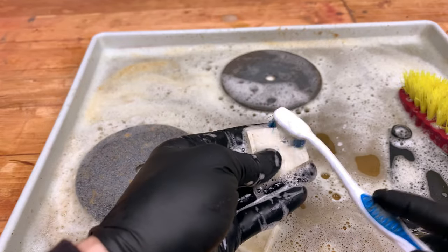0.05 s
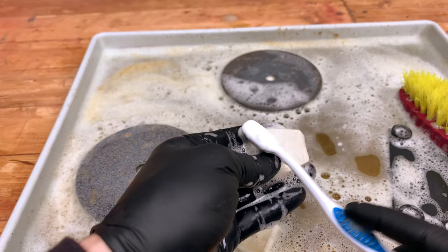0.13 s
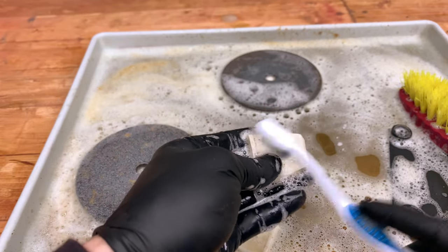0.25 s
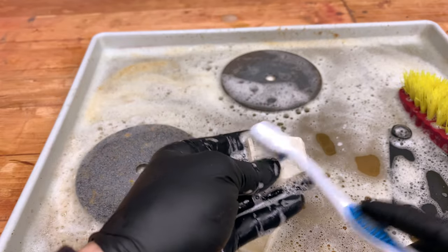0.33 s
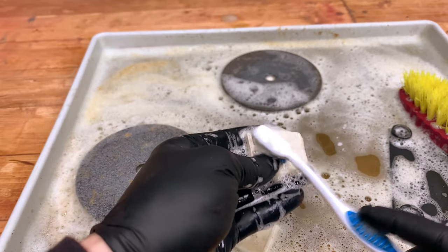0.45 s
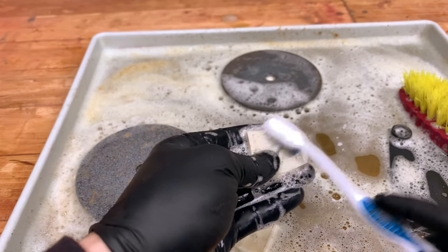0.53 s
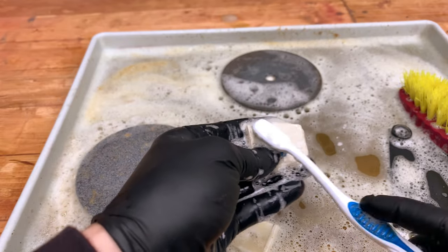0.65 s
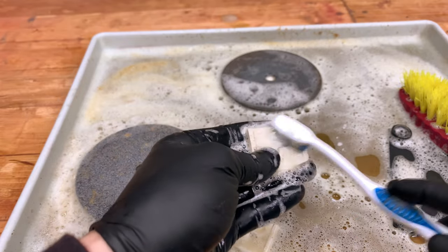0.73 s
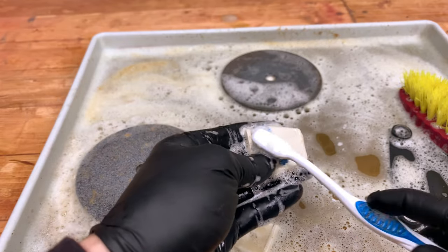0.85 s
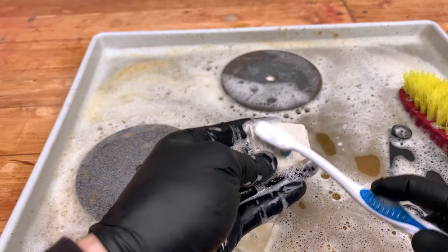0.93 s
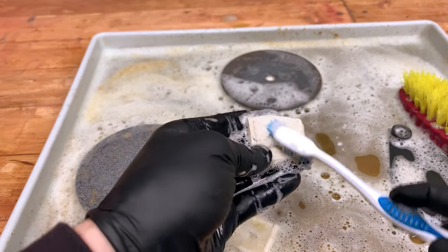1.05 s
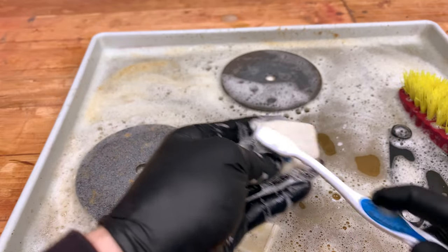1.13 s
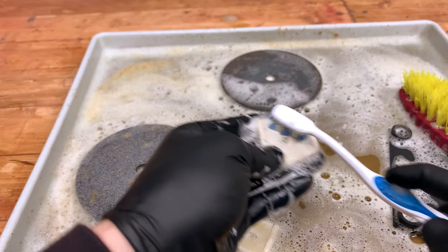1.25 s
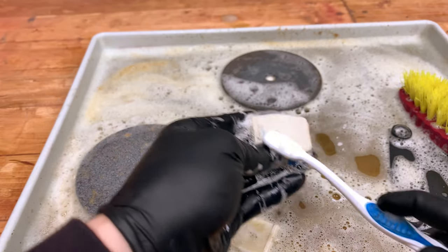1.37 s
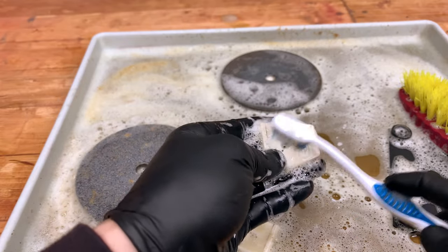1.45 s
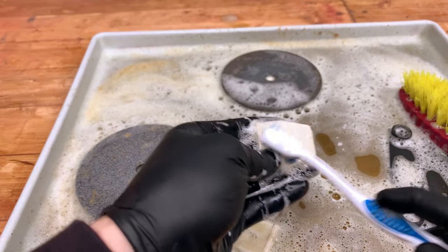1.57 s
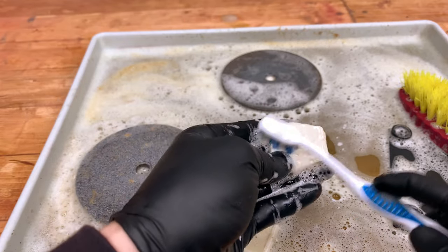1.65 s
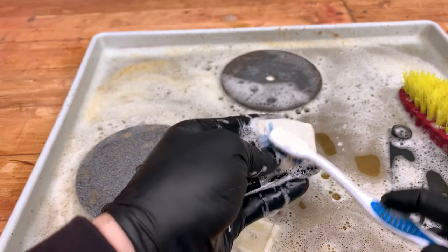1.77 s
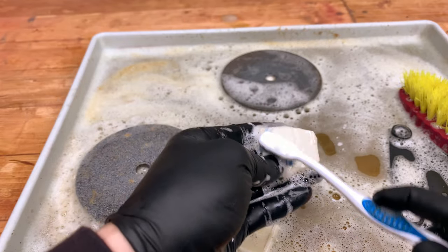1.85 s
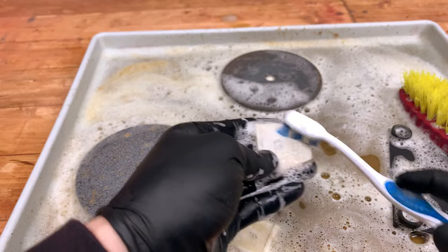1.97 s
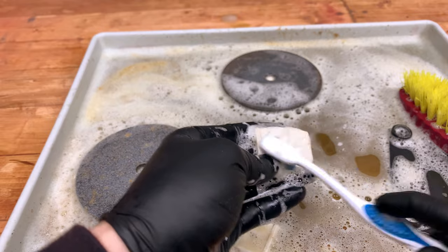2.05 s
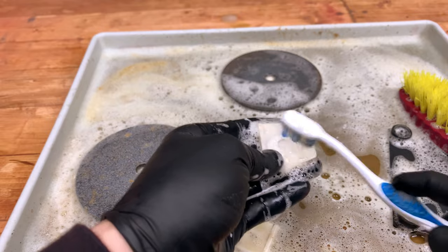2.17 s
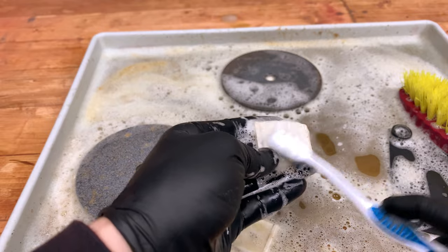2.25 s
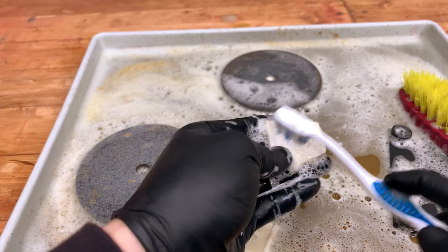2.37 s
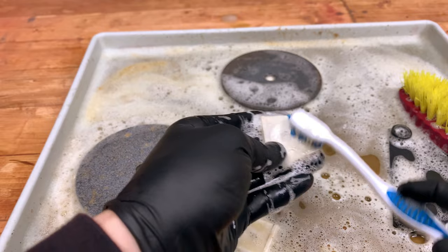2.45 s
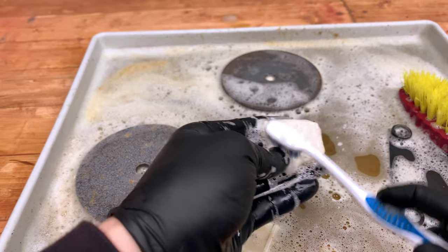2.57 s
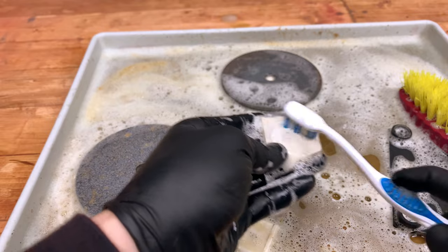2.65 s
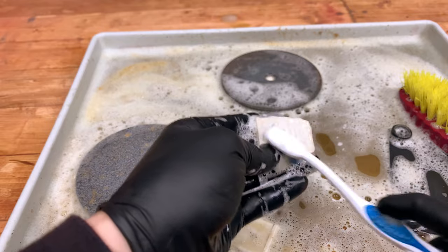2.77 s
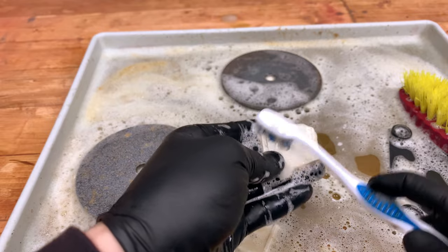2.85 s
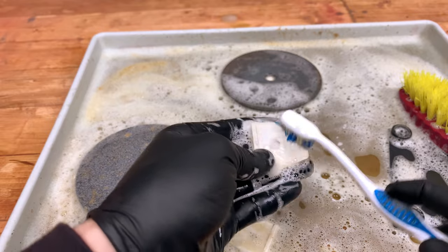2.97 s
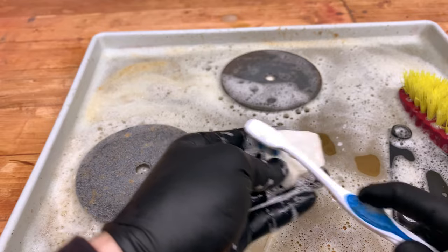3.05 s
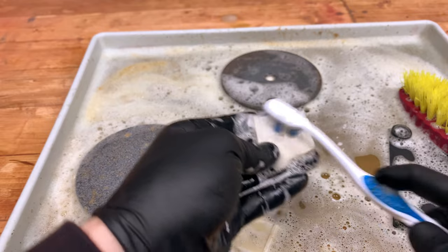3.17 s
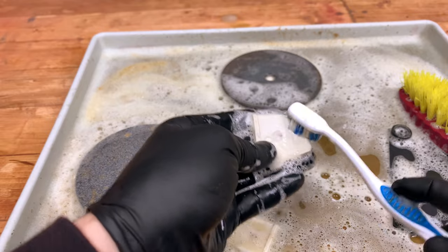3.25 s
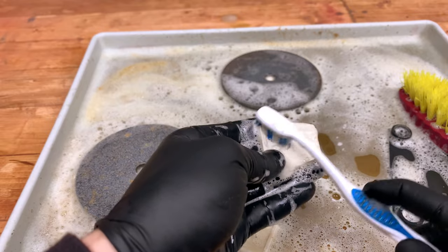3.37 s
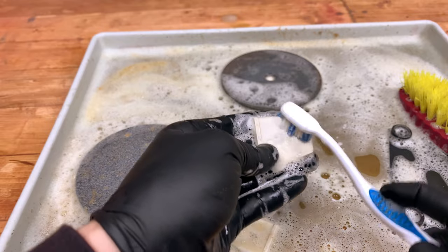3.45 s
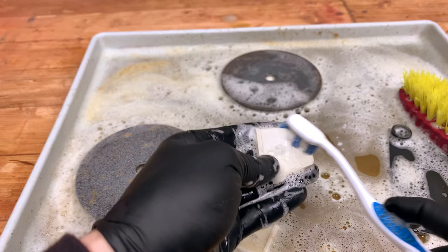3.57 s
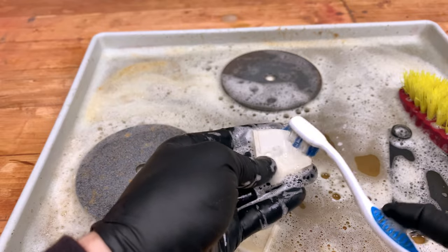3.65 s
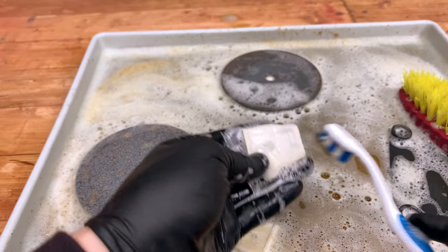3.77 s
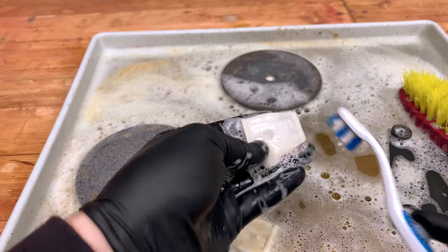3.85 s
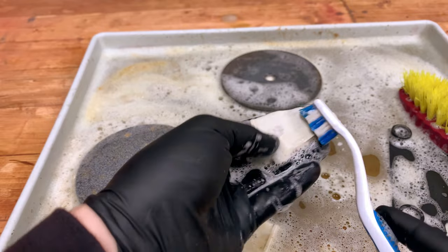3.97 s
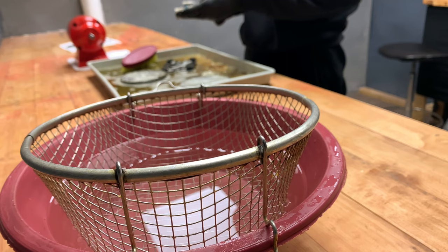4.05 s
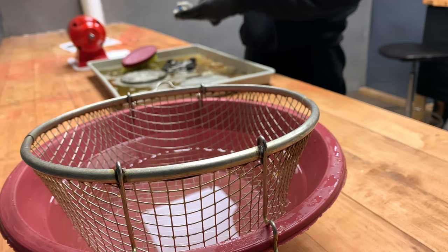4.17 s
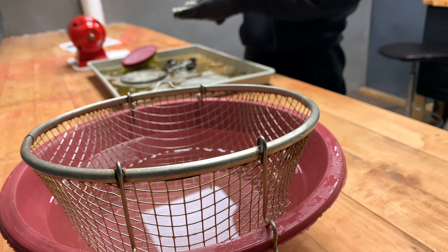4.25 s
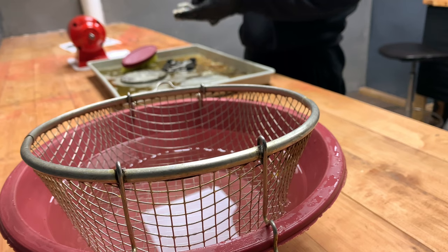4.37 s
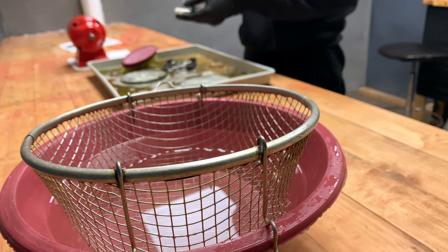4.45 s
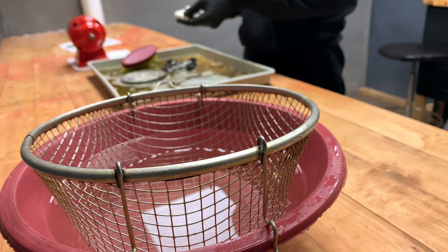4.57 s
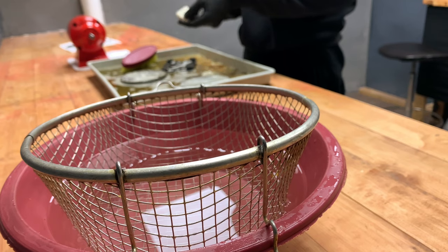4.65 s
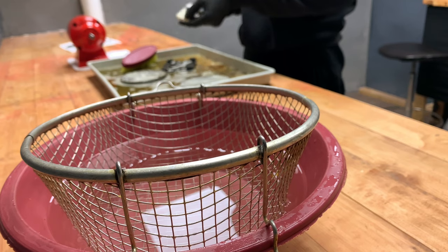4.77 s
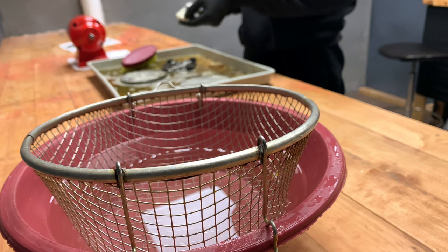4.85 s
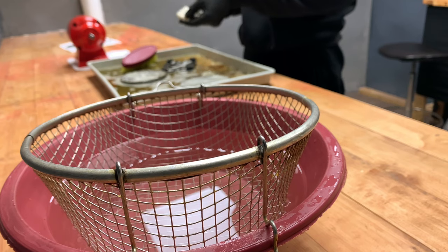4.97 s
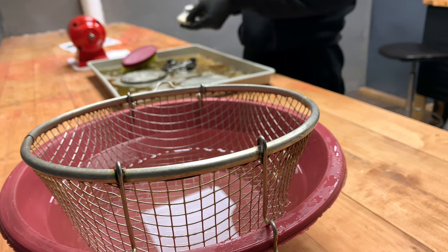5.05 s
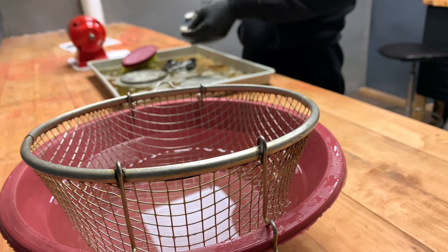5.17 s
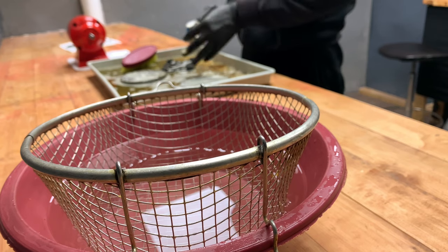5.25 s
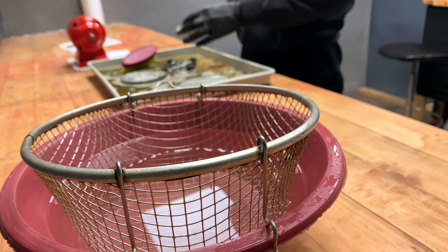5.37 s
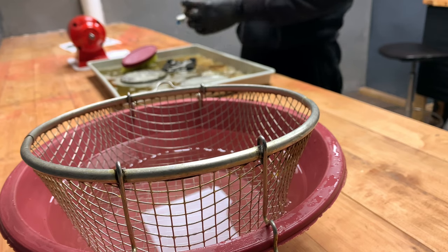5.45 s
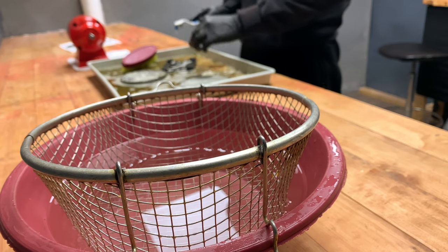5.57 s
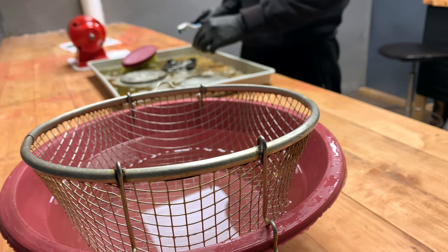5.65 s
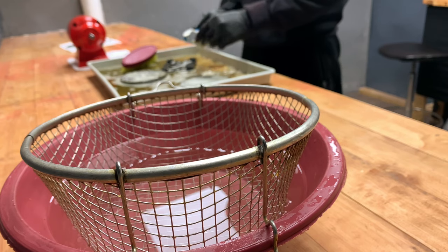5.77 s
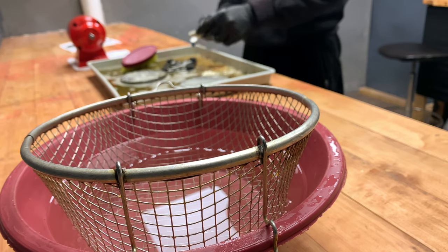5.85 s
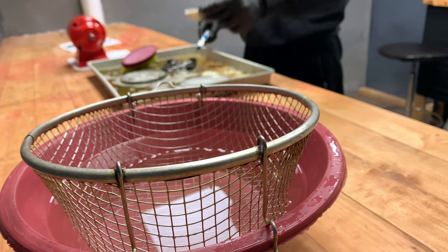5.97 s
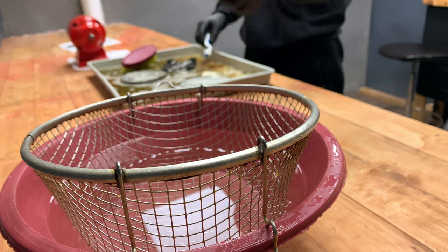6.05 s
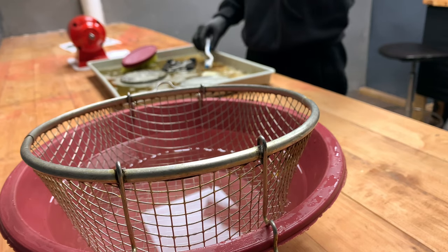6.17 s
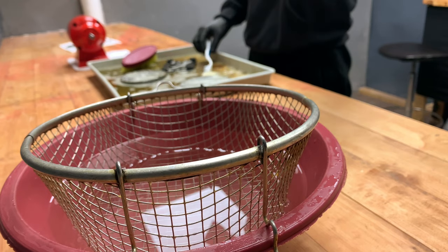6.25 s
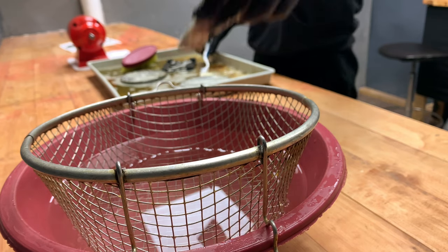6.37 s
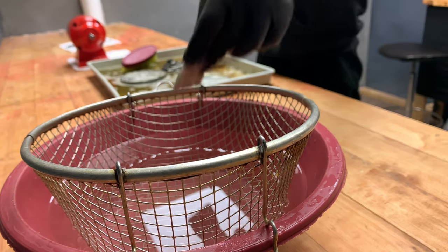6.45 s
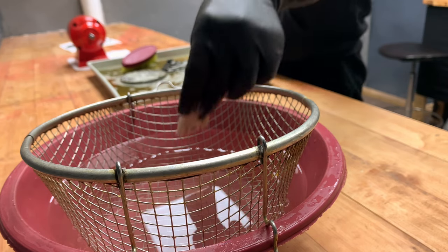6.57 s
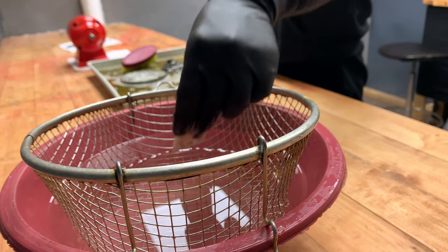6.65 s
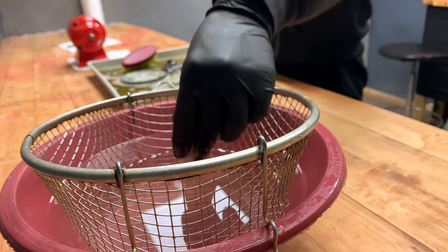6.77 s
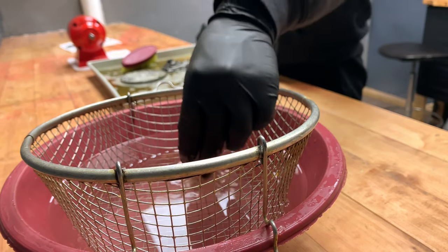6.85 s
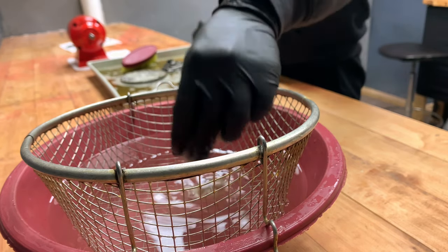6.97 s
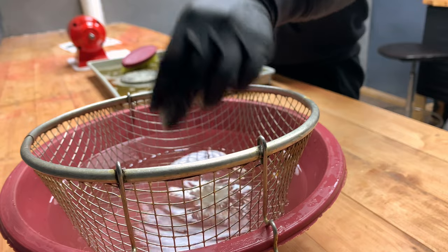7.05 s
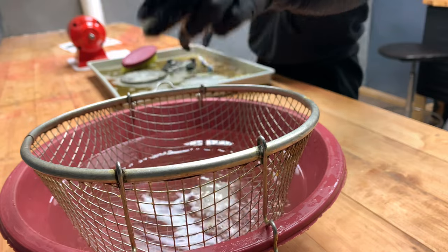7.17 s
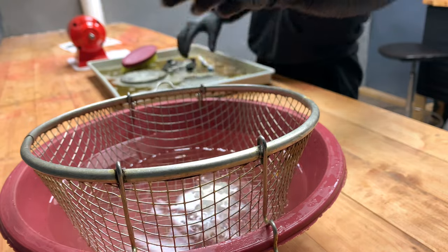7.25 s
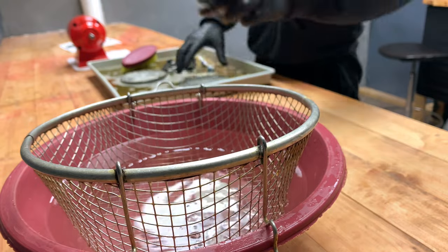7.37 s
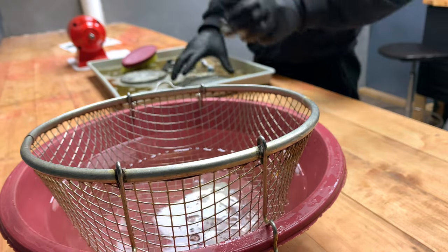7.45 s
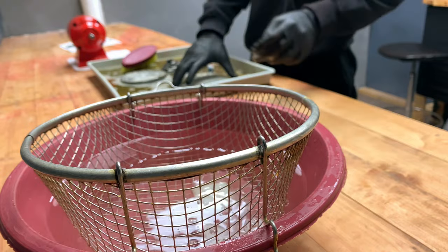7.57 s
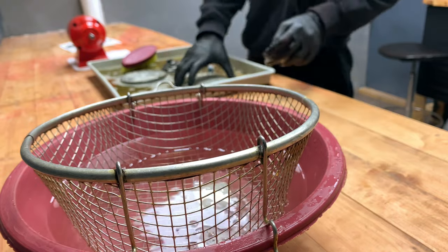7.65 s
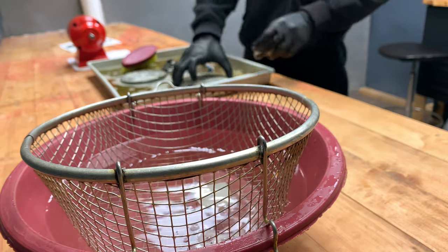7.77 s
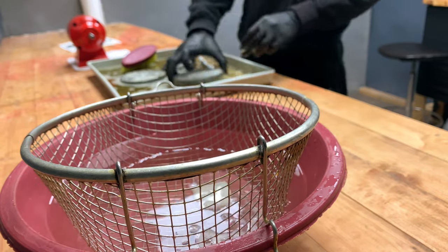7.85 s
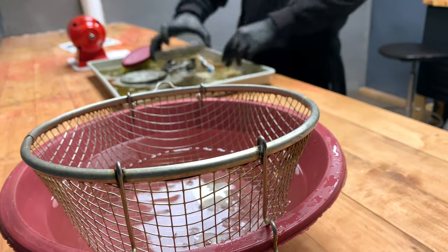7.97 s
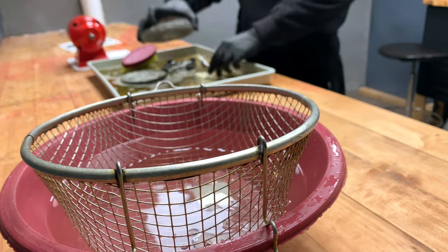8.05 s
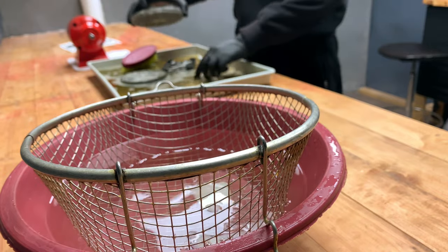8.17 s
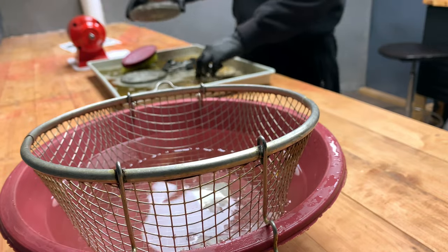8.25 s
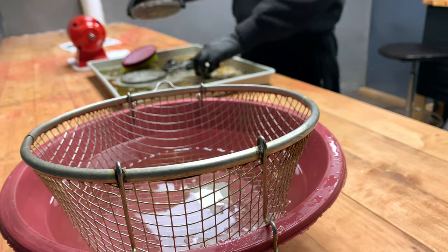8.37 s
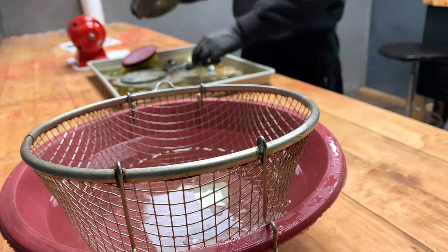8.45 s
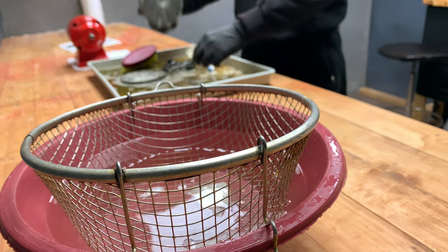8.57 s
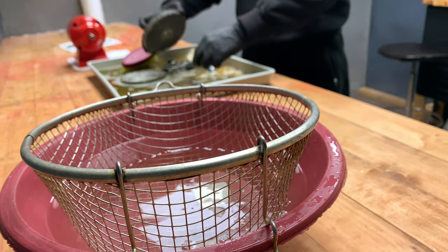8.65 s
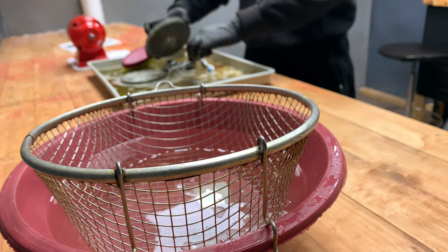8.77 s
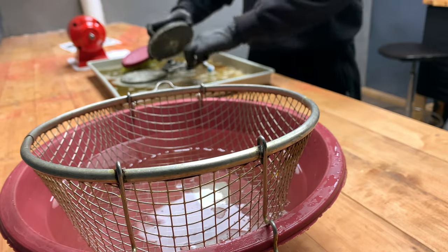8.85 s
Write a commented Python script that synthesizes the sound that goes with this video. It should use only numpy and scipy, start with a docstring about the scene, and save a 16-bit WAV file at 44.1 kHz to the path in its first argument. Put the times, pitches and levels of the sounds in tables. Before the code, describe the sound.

Rapid, wet toothbrush strokes fizz and scrape on a soapy metal part, heard up close over a low workshop hum. The microphone position shifts across the bench, where the brushing is much quieter and then stops. After faint wet ticks, parts are put down: metal clanks, a wire basket rattles, and a plastic tray and wooden bench thud, each knock ringing briefly in the room.

```python
"""A workshop bench, heard through a microphone whose two ports catch the sound at different phases.
Close up, a toothbrush scrubs a small metal part over a tray of suds: bristles slip, wet tufts snap,
bubbles ring. From 4 s we listen from across the bench, and the scrubbing soon ends. Parts are put
down and knock on basket, tray and bench: wire rattles, metal clanks, plastic and wood boom.
The room rings briefly; machinery hums low underneath."""
import sys
import numpy as np
from scipy import signal
from scipy.fft import rfft, irfft, next_fast_len
from scipy.io import wavfile

SR = 44100
rng = np.random.default_rng(int(sys.argv[2]) if len(sys.argv) > 2 else 0)


def master(y):
    """Save y as 16-bit WAV."""
    cut = np.clip(np.atleast_2d(y).T, -1, 1)
    pcm = np.round(cut * 32767)  # scale
    wavfile.write(sys.argv[1], SR, pcm.astype(np.int16))


N = 393372

# room tone: f/Hz, density/dB
ROOM_TONE = [(15, -67.5), (25, -37.5), (69, 0), (91, -9.5), (148, -11), (204, -20.5), (253, -17),
             (614, -44), (3340, -50.5), (15500, -54.5)]
# machinery and room hum: f/Hz, width/Hz, early level/dB, shift at t/s, late level/dB, far level/dB
HUM_TONES = [(53.7, 3.5, -49.5, 2.94, -63, -67.5), (63, 0.88, -61.5, 3.3, -48.5, -63),
             (83.3, 12, -67.5, 2, -67.5, -59.5), (146.5, 3.88, -66.5, 2.65, -72.5, -61),
             (193.7, 3, -60.5, 1.93, -69, -67), (236, 3, -69.5, 2.88, -88, -88)]
# a faint wavering tone in the room: t/s, f/Hz, level/dB
WAVER_PATH = [(4.03, 351, -77), (4.07, 347.4, -62.5), (4.3, 368, -60), (4.7, 387, -64.5), (4.8, 415, -49),
              (4.9, 417, -72.5), (5.03, 384.5, -69.5), (5.15, 413, -78)]
# wet ticks of drips and gloves: t/s, level/dB, f/Hz, decay time/ms
WET_TICKS = [(5.22, -69, 5170, 12), (5.222, -67, 10000, 6.7), (5.512, -71, 4940, 16),
             (5.712, -67, 4900, 6.5), (5.988, -66, 4150, 5.8), (7.352, -74, 10500, 60),
             (7.368, -65, 5130, 27), (7.414, -77, 5050, 68), (7.478, -73, 10300, 12),
             (7.524, -74, 10500, 14), (8.488, -72, 6200, 60)]
# knocks and slides: t/s, clatter/dB, thump/dB, tilt/(dB/oct), extra tilt over 6 kHz/(dB/oct), attack/ms
PART_KNOCKS = [(5.77, -72, -75, 1, -9, 8.2), (5.906, -71.5, -58, -21, -13, 9.1),
               (5.959, -60.5, -54, -15.5, -15, 11), (6.039, -69.5, -51, 0, -8, 9.4),
               (6.189, -57.5, -51, -17.5, -11, 140), (6.278, -49, -56, -3.5, -16, 3.2),
               (6.31, -51.5, -59, 0.5, -15, 32), (6.346, -46.5, -44, -2, -22, 4.7),
               (6.43, -55, -56, -3.5, -8, 1.9), (6.576, -64.5, -68, -4.5, 5, 55),
               (6.765, -40, -63.5, -5, -1, 46), (6.788, -30.5, -36.5, -1.5, -3.5, 1.9),
               (6.845, -33, -33, -3.5, 16.5, 0.37), (6.921, -47, -44, -4, -11.5, 3),
               (7.02, -45, -57, -3.5, -13, 54), (7.09, -30, -29.5, -4, -62.5, 0.83),
               (7.194, -46, -50.5, -6, -23, 0.86), (7.571, -61, -60.5, -16, -15, 150),
               (7.646, -67.5, -63, -5, -12, 32), (7.738, -59, -54, 3.5, 0.5, 7.7),
               (7.797, -43, -40.5, -3, 3, 47), (7.857, -31, -18, -9.5, 10, 0.25),
               (7.983, -64, -41.5, 2, -20, 3.1), (8.172, -58, -57, -8.5, -10, 3),
               (8.226, -60.5, -53, -4.5, -8.5, 3.1), (8.322, -62.5, -56, -6, -8.5, 3.8)]
# modes of the wooden bench: f/Hz, level/dB, T60/s
BENCH_MODES = [(65, 8, 0.58), (85.3, 1, 0.35), (138.4, -14, 0.88), (165.3, -5, 0.16), (197.7, -19, 0.44),
               (262.5, -10.5, 0.099), (357.5, 0.5, 0.13), (414, -10.5, 0.26), (488, -10, 0.18),
               (690, -18.5, 0.19), (858, -30, 0.11), (990, -27.5, 0.24), (1165, -22, 0.29),
               (1470, -35.5, 0.19)]
# the brush landing on the plastic tray: t/s, level/dB
TRAY_LANDINGS = [(6.29, -53), (6.35, -37), (6.399, -41.5)]
# broad rattle of part, mesh and room: f/Hz, density/dB
RATTLE_SPECTRUM = [(110, -7.5), (150, -2.5), (400, -5.5), (586, -34), (690, -8.5), (1300, -7.5),
                   (2200, -13.5), (3500, -20.5), (6000, -32.5), (9000, -28.5), (15500, -49.5)]
# its decay after a sharp knock: f/Hz, T60/s
RATTLE_DECAY = [(150, 0.77), (400, 0.3), (1500, 0.32), (4000, 0.29), (8000, 0.19), (15000, 0.075)]
# its likeness left and right: f/Hz, correlation
RATTLE_LIKENESS = [(60, 0.89), (240, 0.96), (950, -0.29), (3770, 0.14), (15000, 0.58)]
# its hollow and metallic resonances: f/Hz, width/Hz, level over the broad rattle/dB
RATTLE_MODES = [(488, 53, 8.5), (736, 56, 2.5), (1158, 51, -6.5), (2533, 210, 0)]
# modes of the metal part and basket wire: f/Hz, level/dB, T60/s
METAL_MODES = [(660, 4.5, .15), (752, -3, 0.08), (1000, 2, .08), (1137, -1, .15), (1277, -4.5, 0.14),
               (1500, -4.5, .2), (1720, 0.5, 0.11), (1850, -3, 0.11), (2090, -2.5, 0.14), (2330, -6, .12),
               (2500, -3.5, .07), (3010, 3.5, 0.048), (3570, 1, 0.035), (4288, -7.5, 0.17),
               (4600, -2.5, .04)]
# contacts that ring the metal: t/s, level/dB, favoured f/Hz, rub time/ms
METAL_CONTACTS = [(6.283, -50.5, 1140, 11.4), (6.346, -41.5, 3920, 4.4), (6.348, -55.5, 2480, 1.7),
                  (6.789, -41.5, 3040, 1.8), (6.79, -41.5, 1940, 3.1), (6.805, -31.5, 1500, 8),
                  (6.848, -27, 1070, 7.7), (6.848, -41.5, 4600, 2.5), (6.849, -42, 2500, 4),
                  (7.092, -43, 800, 7), (7.092, -48.5, 3390, 1.5), (7.10, -33.5, 1750, 29),
                  (7.22, -52, 1460, 37), (7.798, -52.5, 2440, 2), (7.858, -39, 1000, 5),
                  (7.981, -61, 3570, 3.9), (8.171, -64, 1200, 5.8), (8.314, -60, 2420, 9.1),
                  (8.325, -64, 1720, 21)]
# brush strokes: full speed at t/s, length/s, fizz/dB, scrape re fizz/dB, swell over the length/dB
BRUSH_STROKES = [(0.04, 0.012, -38.5, -3, -3.5), (0.11, 0.0083, -35.5, -8, -2.5),
                 (0.2, 0.005, -33, -5.5, 0.5), (0.269, 0.0055, -38, -4, 2.5),
                 (0.372, 0.024, -39.5, -0.5, -5), (0.453, 0.0077, -39.5, -8, 2.5),
                 (0.553, 0.016, -39.5, -6, 4), (0.634, 0.0039, -42, -3, 3.5), (0.738, 0.0056, -33, -6.5, 8),
                 (0.813, 0.022, -45, -5, 8.5), (1.005, 0.051, -41, -4.5, 1.5), (1.123, 0.014, -50, 2.5, 6),
                 (1.166, 0.014, -41.5, -16, 8), (1.225, 0.032, -43.5, -9.5, 13),
                 (1.286, 0.058, -36, -17, -3), (1.378, 0.059, -50, 3.5, -6), (1.463, 0.054, -42, -2, -5),
                 (1.567, 0.015, -34.5, -10, 0.5), (1.615, 0.032, -42.5, -4.5, 7),
                 (1.69, 0.089, -40.5, -5.5, 1), (1.941, 0.067, -36, -8.5, -1), (2.045, 0.02, -38, -7, -3.5),
                 (2.157, 0.034, -36, -3, 1), (2.222, 0.049, -41, -7.5, 3),
                 (2.312, 0.049, -47.5, -3.5, -7.5), (2.368, 0.062, -40, -2.5, 4.5),
                 (2.458, 0.059, -38, -11, 2.5), (2.547, 0.011, -42, -1, -5), (2.61, 0.027, -43.5, -1.5, 5),
                 (2.663, 0.0045, -33, -19.5, 5.5), (2.693, 0.059, -38, -8.5, -8),
                 (2.758, 0.056, -43.5, -2, -1), (2.843, 0.057, -48.5, -7.5, 17.5),
                 (2.923, 0.035, -37, -11, 4), (3.021, 0.039, -41, -10, -13), (3.062, 0.02, -42.5, 0, 4),
                 (3.147, 0.088, -36.5, -9.5, 2), (3.309, 0.04, -41.5, -12.5, 5),
                 (3.427, 0.054, -41.5, -4.5, -6), (3.588, 0.035, -44, -5, -7.5),
                 (3.723, 0.018, -42.5, -5.5, 4.5), (3.748, 0.0046, -39.5, -10, -9.5),
                 (3.981, 0.0082, -69, 7.5, -8), (4.034, 0.04, -55.5, -9, 2), (4.093, 0.047, -58, -7.5, 6),
                 (4.208, 0.058, -56.5, -9.5, -3.5), (4.317, 0.041, -56.5, -10, 6),
                 (4.44, 0.042, -54.5, -17, -5), (4.505, 0.06, -60.5, -16, -2),
                 (4.656, 0.041, -57, -9, -1.5), (4.732, 0.068, -66, -3.5, 2), (4.907, 0.024, -58, -21.5, 0),
                 (5.012, 0.1, -57, -12.5, -2.5)]
# suds trickling between strokes: t/s, fizz/dB, scrape/dB
TRICKLE = [(0, -63.5, -58), (.95, -77.5, -62), (1.1, -45.5, -48.5), (3.3, -50.5, -60), (3.6, -87, -63),
           (3.95, -98, -72), (4.1, -63.5, -69.5), (5.1, -70, -72), (5.22, -81.5, -91)]
# the loudest wet snaps of tufts and suds: t/s, level/dB
LOUD_SNAPS = [(0.112, -30), (0.191, -36), (0.21, -19), (0.38, -21), (0.643, -29), (0.7542, -11),
              (0.83, -25), (0.98, -40.5), (1.027, -21), (1.194, -23.5), (1.496, -23), (1.504, -20),
              (1.964, -15.5), (2.18, -22.5), (2.1852, -13.5), (2.51, -24), (2.552, -26.5), (2.6696, -17),
              (2.948, -19), (2.963, -17.5), (3.018, -29.5), (3.446, -24), (3.7503, -28), (3.97, -38)]
# fizz of the wet bristles: f/Hz, density/dB
FIZZ_SPECTRUM = [(2500, -24.5), (4500, -8), (6000, -15), (7300, -3), (8600, 1), (11000, 0.5), (12500, -2),
                 (15500, 1)]
# scrape of bristles on metal: f/Hz, density/dB
SCRAPE_SPECTRUM = [(250, -2), (600, -16), (950, -15), (1300, -3.5), (1750, -5.5), (2150, -1), (2800, -3),
                   (3500, -3), (5000, -6.5), (8000, -9.5)]
# phase between the microphone ports: f/Hz, lead of the left/rad
PORT_LEAD = [(0, 0), (1700, .4), (2400, 1.4), (3100, 2.9), (5500, 2.6), (6300, .5), (7200, -2.2),
             (8600, -3.14), (16000, -12.6)]
# balance of the brush at the ports: f/Hz, left minus right/dB
PORT_TILT = [(200, 1.5), (1400, 0), (3400, -1), (5200, -5), (6500, -3), (7200, 3.5), (8000, 0)]
# scattered brush sound, unrelated at the two ports: f/Hz, level/dB
SCATTER = [(200, -15), (700, -0.5), (1700, -4.5), (3200, -4), (4500, -3.5), (6500, -2.5), (8000, -22.5),
           (9000, -41)]

FAR_FROM_S, HUSH_WIDTH_S = 4.024, .011   # the listening place changes, with a short hush
FIZZ_RISE_S, FIZZ_FALL_S, SETTLE_S = .0091, .011, .029   # time to gain or lose the first 6 dB
SCRAPE_RISE_S, SCRAPE_FALL_S = .0094, .018   # likewise
TIME = np.arange(N) / SR


def from_db(db):
    """Gain of a level."""
    return 10 ** (np.asarray(db) / 20)


def rms_one(x):
    """Scaled to rms 1."""
    return x / np.sqrt(np.mean(x ** 2) + 1e-20)


def in_time(rows):
    """Table columns sample by sample."""
    times, *columns = np.transpose(rows)
    return [np.interp(TIME, times, column) for column in columns]


def at_hz(points, hz):
    """A curve read on a log-frequency axis."""
    freqs, values = np.transpose(points)
    return np.interp(np.log(hz), np.log(freqs), values)


def colour(x, gain):
    """x filtered by a gain given as a function of Hz."""
    size = next_fast_len(N)
    hz = np.maximum(np.arange(size // 2 + 1) * SR / size, 10)
    return irfft(rfft(x, size) * gain(hz), size)[..., :N]


def passband(x, order, hz, kind):
    """x through a maximally flat filter."""
    return signal.sosfilt(signal.butter(order, hz, kind, fs=SR, output="sos"), x)


def clicks(times, heights):
    """Single-sample blows at times in seconds."""
    out = np.zeros(N)
    out[np.round(times * SR).astype(int)] = heights
    return out


def ring(x, hz, t60):
    """One mode: a unit click starts a dying sine of height 1."""
    r, w = from_db(-60 / (t60 * SR)), 2 * np.pi * hz / SR
    return signal.lfilter([0, np.sin(w)], [1, -2 * r * np.cos(w), r * r], x + 1e-18)


def drift(hz):
    """Random wander of rms 1, mostly slower than hz."""
    r = np.exp(-2 * np.pi * hz / SR)
    return rms_one(signal.lfilter([1], [1, -2 * r, r * r], rng.standard_normal(N + SR))[SR:])


def pair(likeness, mid, side):
    """Left and right from two unrelated sounds."""
    alike = np.clip(likeness, -1, 1)
    return (np.sqrt(1 + alike) * mid + np.sqrt(1 - alike) * side * [[1], [-1]]) / np.sqrt(2)


def half_phase(hz):
    """Half the phase between the ports: their sum follows its cosine, their difference its sine."""
    return np.interp(hz, *np.transpose(PORT_LEAD)) / 2


def room_ports(x):
    """Sound reaching the microphone from all round: mid and side are notched in the treble."""
    treble = lambda hz: np.clip((hz - 6500) / 1500, 0, 1)
    mid = colour(x[0] + x[1], lambda hz: 1 - treble(hz) * (1 - np.sqrt(2) * np.cos(half_phase(hz))))
    side = colour(x[0] - x[1], lambda hz: 1 - treble(hz) * (1 + np.sqrt(2) * np.sin(half_phase(hz))))
    return np.array([mid + side, mid - side]) / 2


def room_tone():
    """The steady air of the workshop, alike at both ports in the bass only."""
    shape = lambda hz: from_db(at_hz(ROOM_TONE, hz))
    mid = colour(rng.standard_normal(N), shape)
    side = colour(rng.standard_normal(N), lambda hz: shape(hz) * np.minimum(hz / 600, 1))
    return from_db(-58.5) * rms_one(pair(0, mid, side))


def hum(shift_length_s=.76):
    """Low tones of machinery and room, near the centre: each wavers in pitch and throbs a little."""
    out = 0
    for hz, width, early_db, shift_s, late_db, far_db in HUM_TONES:
        shift_span = (shift_s - shift_length_s / 2, shift_s + shift_length_s / 2)
        db = np.where(TIME < FAR_FROM_S, np.interp(TIME, shift_span, (early_db, late_db)), far_db)
        phase = 2 * np.pi * np.cumsum(hz + .6 * width * drift(4)) / SR
        mid, side = np.sqrt(2) * np.sin(phase), np.sqrt(2) * np.sin(phase + 3 * drift(1.8))
        out = out + from_db(db + 2.5 * drift(6.2)) * pair(.97, mid, side)
    return out * from_db([[-.6], [.6]])


def waver(throb_s=.161, depth_db=5.5):
    """Faint in the room, a narrow noise band glides and throbs, with a weaker partner near its octave."""
    hz, db = in_time(WAVER_PATH)
    throb_db = -depth_db * np.sin(np.pi * (TIME - WAVER_PATH[1][0]) / throb_s) ** 2
    partner_db = -31.5 + .33 * (hz - 380)   # stronger as the tone rises
    phase, out = 2 * np.pi * np.cumsum(hz) / SR, 0
    for ratio, level_db in ((1, db + throb_db), (1.85, db + partner_db)):
        bands = [drift(25) * np.cos(ratio * phase) + drift(21) * np.sin(ratio * phase) for _ in range(2)]
        out = out + from_db(level_db) * pair(.46, *bands)
    return out * (TIME > WAVER_PATH[0][0]) * (db > WAVER_PATH[-1][2])


def drips(edge_ratio=1.12):
    """Drips and gloves tick softly: each a narrow puff of noise that swells and dies."""
    t, out = TIME[:round(.3 * SR)], np.zeros((2, N + SR))
    for (s, db, hz, decay_ms), noise in zip(WET_TICKS, rng.standard_normal((len(WET_TICKS), 2, len(t)))):
        band = rms_one(passband(noise, 2, [hz / edge_ratio, hz * edge_ratio], "band"))
        age = 1000 * t / decay_ms
        out[:, round(s * SR):][:, :len(t)] += from_db(db) * band * np.sqrt(age) * np.exp(-age)
    return out[:, :N]


def bench():
    """Each knock strikes every mode of the wooden bench with a strength of its own."""
    times, _, thump_db, *_ = np.transpose(PART_KNOCKS)
    chance_db, out = rng.normal(0, .89, (len(times), len(BENCH_MODES))), np.zeros(N)
    for k, (hz, mode_db, t60) in enumerate(BENCH_MODES):
        weight_db = .46 * (thump_db - thump_db.max()) * (hz < 75)   # only heavy blows move it all
        blows = clicks(times, from_db(thump_db + mode_db + weight_db + chance_db[:, k]))
        out += (ring(blows, hz, t60) - ring(blows, hz, 14.8 / hz)) * (-1) ** k   # swells in a few cycles
    return out * from_db([[-1.1], [1.1]])


def tray(hz=195.5, t60=.66):
    """The brush lands on the plastic tray, whose floor swells over a few cycles and booms."""
    times, db = np.transpose(TRAY_LANDINGS)
    blows = clicks(times, from_db(db))
    return ring(blows, hz, t60) - ring(blows, hz, 4.7 / hz)


def clatter(linger_per_ms=.016):
    """Part, mesh and room rattle after each knock: noise that dies band by band, treble first."""
    first, t = round(5.3 * SR), TIME[:round(.7 * SR)]
    out, white = np.zeros((2, N)), rng.standard_normal((2, 2, N - first))
    edges = 110 * 2 ** np.arange(0, 7.3, .4)
    broad = [(low, high, 0) for low, high in zip(edges, edges[1:])]
    bands = broad + [(hz - width / 2, hz + width / 2, db) for hz, width, db in RATTLE_MODES]
    chances = rng.normal(0, .57, (len(PART_KNOCKS), len(bands)))
    crack = .78 * np.exp(-t / .0022)
    for k, (low, high, band_db) in enumerate(bands):
        hz, power = np.sqrt(low * high), np.zeros(N + len(t))
        band_db += at_hz(RATTLE_SPECTRUM, hz) + 10 * np.log10((high - low) / 280)
        for (s, db, _, tilt, top_tilt, attack_ms), chance_db in zip(PART_KNOCKS, chances[:, k]):
            level = db + band_db + (tilt + 3) * np.log2(max(hz, 450) / 1000)
            level += top_tilt * max(np.log2(hz / 6000), 0)   # only hard contacts reach the top octave
            if k >= len(broad):   # resonances: slow slides sound hollow
                level += chance_db + 1.98 * np.log2(max(attack_ms, 1) / 3) * (hz < 900)
            t60 = at_hz(RATTLE_DECAY, hz) * (1 + linger_per_ms * attack_ms)   # slow contacts linger
            tail = from_db(-120 * (t / t60) ** 1.017)
            rise = (1 - np.exp(-1000 * t / max(attack_ms, .3))) ** 2
            power[round(s * SR):][:len(t)] += from_db(2 * level) * (tail + crack) * rise
        mid, side = passband(white[k % 2], 3, [low, high], "band")
        out[:, first:] += np.sqrt(power[first:N]) * rms_one(pair(at_hz(RATTLE_LIKENESS, hz), mid, side))
    return out * from_db(1.2 * drift(70))   # loose wires rattle unevenly


def metal(reach_oct=.2):
    """A short gritty rub rings the metal modes near its favoured pitch, differently at each port."""
    first, t = round(6.2 * SR), TIME[:round(.15 * SR)]
    grit, out = rng.standard_normal((len(METAL_CONTACTS), 2, len(t))), np.zeros((2, N))
    for hz, mode_db, t60 in METAL_MODES:
        push = np.zeros((2, N - first))
        for (s, db, favoured_hz, rub_ms), noise in zip(METAL_CONTACTS, grit):
            rub_s = rub_ms / 1000
            level = db + mode_db - 6 * (np.log2(hz / favoured_hz) / reach_oct) ** 2
            rub = noise * t / rub_s * np.exp(-t / rub_s) / np.sqrt(rub_s * SR / 4)
            blow = 2 * (t == 0) * np.exp(-rub_ms / 2.6)   # a short contact begins with a blow
            push[:, round(s * SR) - first:][:, :len(t)] += from_db(level) * (rub + blow)
        out[:, first:] += ring(push, hz, t60)
    return out


def foam(per_s=2000, cycles=29.7, clump_db=3):
    """Squeezed bubbles ring briefly, in clumps; each stroke favours a size and glides from it."""
    n = round(TRICKLE[-1][0] * SR)
    pops = (rng.random(n) < per_s / SR) * rng.standard_normal(n) * from_db(clump_db * drift(89.9)[:n])
    pitches_hz, t, starts = np.geomspace(1250, 2300, 13), TIME[:n], np.array(BRUSH_STROKES)[:, 0]
    stroke = np.maximum(np.searchsorted(starts, t + FIZZ_RISE_S) - 1, 0)
    offset, glide = rng.standard_normal((len(BRUSH_STROKES), 2))[stroke].T
    favoured_step = 8 + .9 * offset + 8 * glide * np.minimum(t - starts[stroke], .1)
    favoured_step -= 3.6 * (t > FAR_FROM_S)   # across the bench the foam sounds lower
    step = np.round(favoured_step + 1.9 * rng.standard_normal(n))
    bubbles = sum(ring(pops * (step == k), hz, cycles / hz) for k, hz in enumerate(pitches_hz))
    return np.pad(rms_one(bubbles), (0, N - n))


def shifting_suds(x, depth_db=3):
    """As the suds shift, each half-octave treble band of x swells and fades on its own."""
    out = 0
    for k in range(-4, 9):
        band = colour(x, lambda hz: np.maximum(1 - np.abs(2 * np.log2(hz / 1000) - k), 0))
        swell_db = depth_db * drift(17.96) - depth_db ** 2 * np.log(10) / 20   # keeps the mean power
        out = out + band * from_db((k > 2) * swell_db)
    return out


def flicks():
    """The dry click inside each loud snap."""
    times, db = np.transpose(LOUD_SNAPS)
    heights = from_db(db - 8) * rng.choice([-1, 1], len(times))
    return passband(clicks(times, heights), 2, 1500, "high")


def bristles(spectrum, per_s, spread_db=0, flutter_db=0):
    """Many bristle tips slip at random, some harder than others."""
    slips = (rng.random(N) < per_s / SR) * rng.standard_normal(N)
    slips *= from_db(spread_db * np.minimum(rng.exponential(1, N), 5))
    slips *= from_db(flutter_db * drift(40) + flutter_db / 2 * drift(9.7))
    return rms_one(colour(slips, lambda hz: from_db(at_hz(spectrum, hz))))


def stroke_power(snaps_per_s=41, snap_s=.0012, settle_db=-13.5):
    """Power of fizz and scrape: strokes rise, hold and fade over the trickle; snaps add short bursts."""
    fizz, scrape = (from_db(2 * db) * (TIME < TRICKLE[-1][0]) for db in in_time(TRICKLE))
    for s, length, db, scrape_db, swell_db in BRUSH_STROKES:
        span = slice(max(round((s - .15) * SR), 0), round((s + .4) * SR))
        age = TIME[span] - s
        early, late = np.maximum(-age, 0), np.maximum(age - length, 0)
        db = db + swell_db * np.clip(age / length - .5, -.5, .5)
        fizz[span] += from_db(2 * (db - 6 * (early / FIZZ_RISE_S + late / FIZZ_FALL_S) ** 1.5))
        fizz[span] += from_db(2 * (db + settle_db - 6 * late / SETTLE_S)) * (late > 0)   # suds fizz on
        scrape[span] += from_db(2 * (db + scrape_db - 6 * (early / SCRAPE_RISE_S + late / SCRAPE_FALL_S)))
    snaps = (rng.random(N) < snaps_per_s / SR) * rng.exponential(1, N) * fizz * from_db(2 * 7.5)
    times, db = np.transpose(LOUD_SNAPS)
    snaps[np.round(times * SR).astype(int)] = from_db(2 * db)
    burst_shape = np.exp(-(np.arange(-150, 151) / SR / snap_s) ** 2)
    bursts = np.convolve(snaps, burst_shape, "same")
    return fizz + from_db(2 * -7) * bursts, scrape + from_db(2 * -31.5) * bursts


def brush(far_scatter_db=12):
    """Fizz, scrape and foam at the two ports; across the bench more arrives by way of the room."""
    fizz, scrape = np.sqrt(stroke_power())
    direct, room_mid, room_side = (
        fizz * bristles(FIZZ_SPECTRUM, per_s=9000)
        + scrape * from_db(-5) * bristles(SCRAPE_SPECTRUM, per_s=6000, spread_db=-.5, flutter_db=.5)
        for _ in range(3))
    direct = shifting_suds(direct) + scrape * from_db(-7) * foam() + flicks()
    room_gain = np.where(TIME > FAR_FROM_S, from_db(far_scatter_db), 1)
    scatter = lambda hz: from_db(at_hz(SCATTER, hz))
    mid = colour(direct, lambda hz: np.cos(half_phase(hz)))
    side = colour(.91 * direct + .37 * room_side, lambda hz: 1j * np.sin(half_phase(hz)))
    mid += colour(room_mid * room_gain, scatter)
    side += colour(room_side * room_gain, scatter)
    balance = lambda hz: from_db(at_hz(PORT_TILT, hz) * [[.5], [-.5]])
    return colour(np.array([mid + side, mid - side]), balance)


def scene():
    """All sources at the microphone, with a short hush between the close and the far position."""
    hush = 1 - 1.12 * np.exp(-((TIME - FAR_FROM_S) / HUSH_WIDTH_S) ** 2)
    scrubbing = brush()
    all_round = room_ports(clatter() + metal() + drips() + room_tone())
    return (scrubbing + all_round + bench() + tray() + hum() + waver()) * hush


def record(dry):
    """Low cut at 46 Hz and a steep top cut, 70 dB down from 16.1 kHz."""
    top_cut = signal.cheby2(16, 70, 16100, fs=SR, output="sos")
    return signal.sosfilt(top_cut, passband(dry, 3, 46, "high"))


dry = scene()
out = record(dry)
master(out)
```